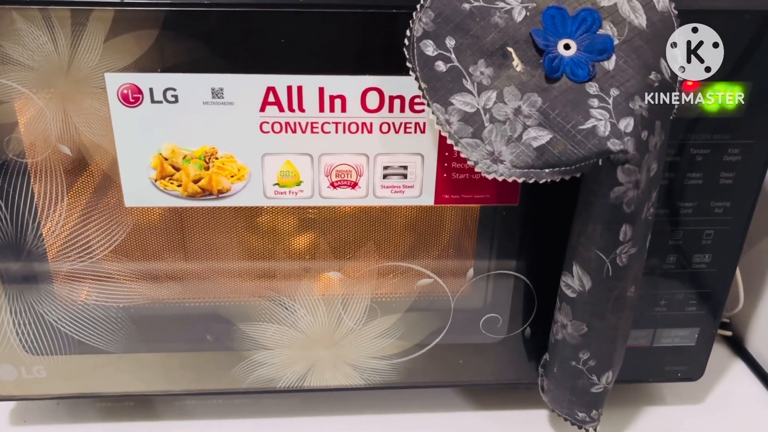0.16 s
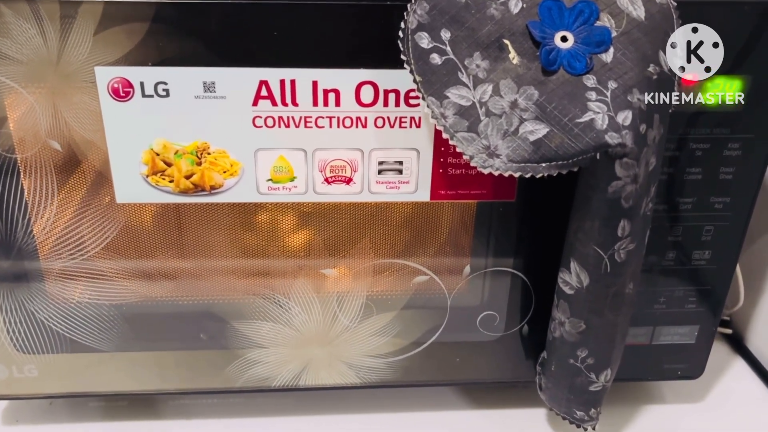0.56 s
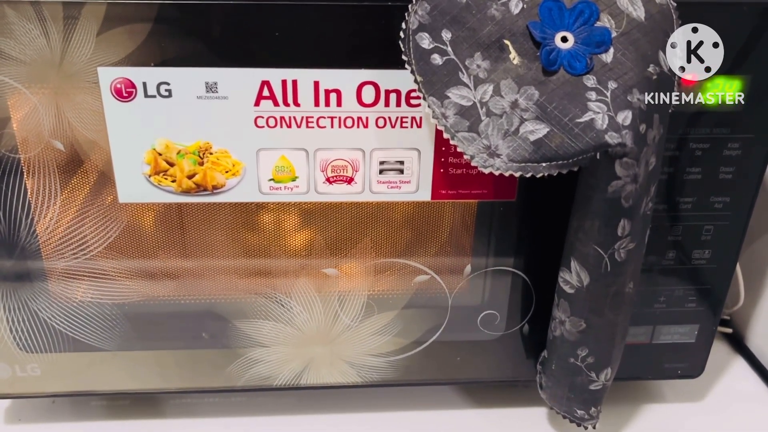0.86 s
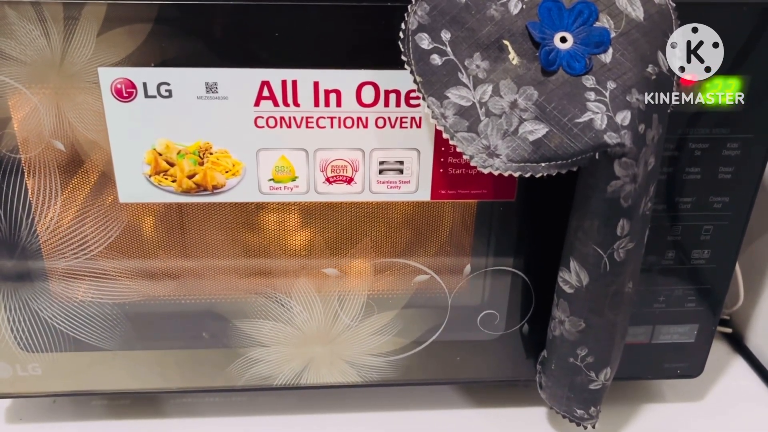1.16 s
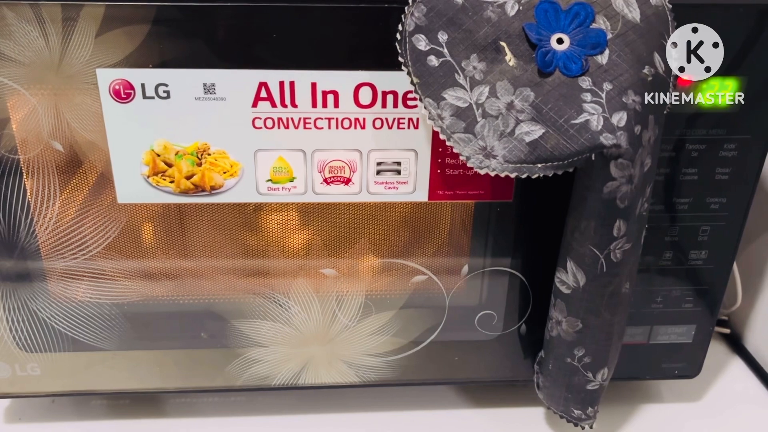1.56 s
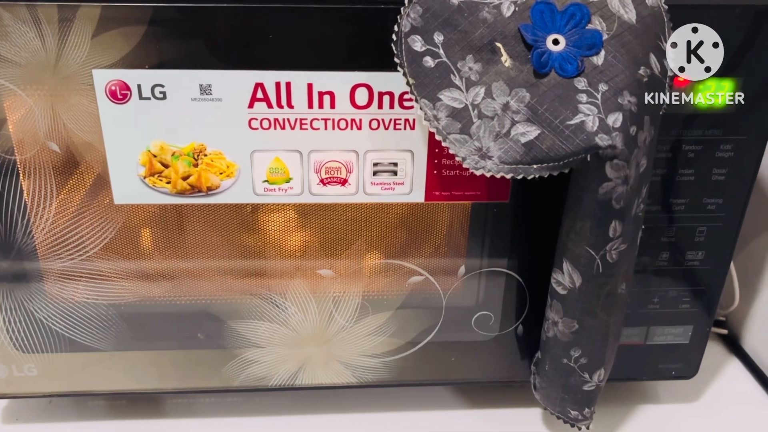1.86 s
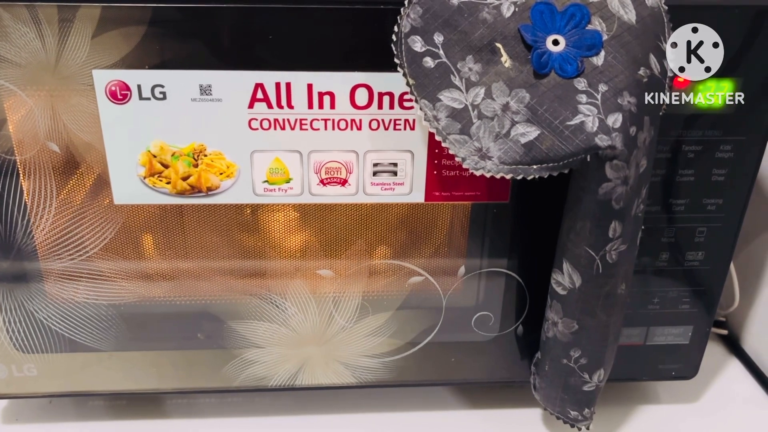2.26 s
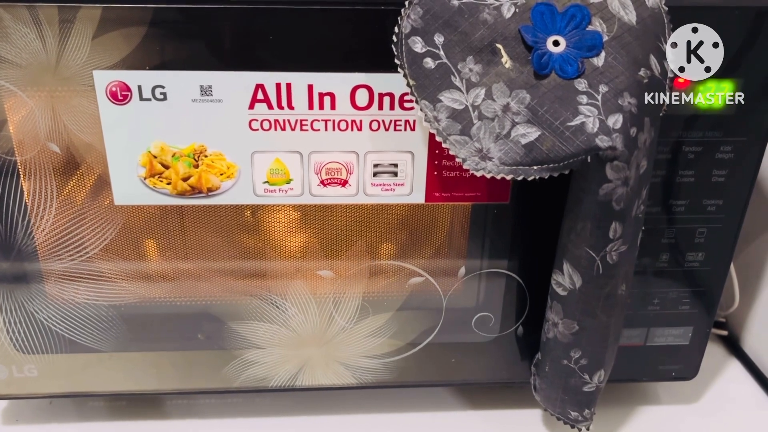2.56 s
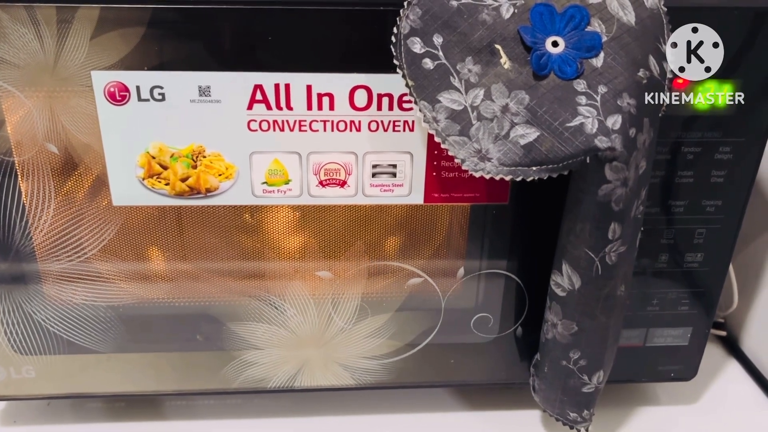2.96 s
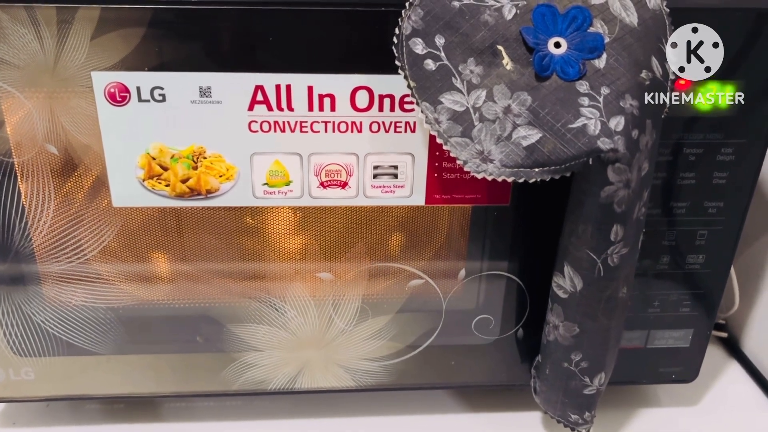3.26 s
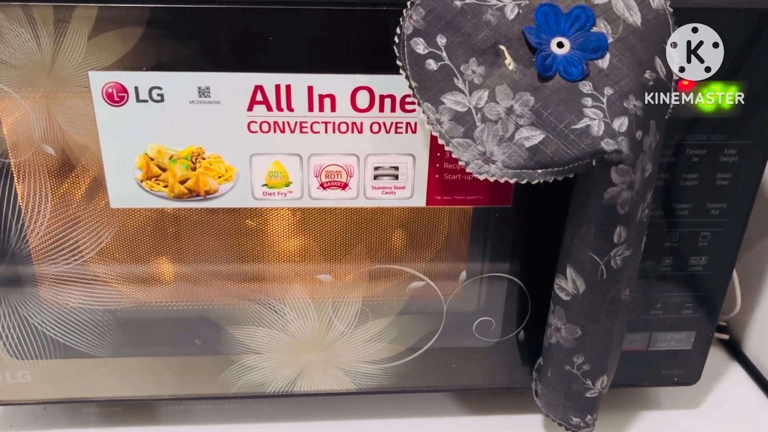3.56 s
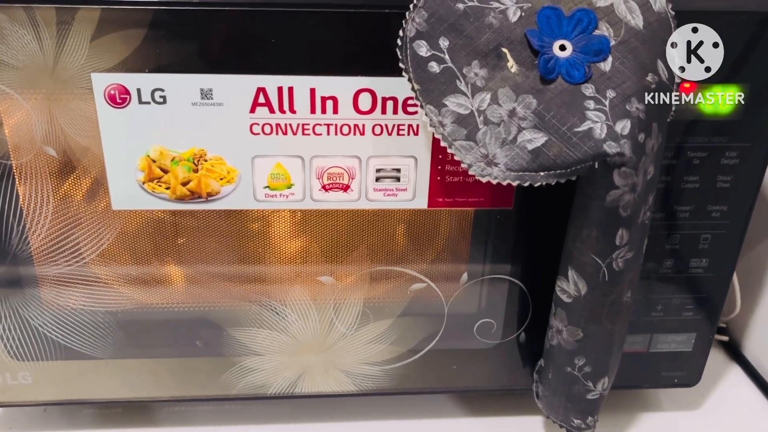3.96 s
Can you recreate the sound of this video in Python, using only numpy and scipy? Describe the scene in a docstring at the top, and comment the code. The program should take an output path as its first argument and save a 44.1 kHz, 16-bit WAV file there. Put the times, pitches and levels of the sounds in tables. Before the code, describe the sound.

Continuous appliance drone from a working microwave oven, captured by a nearby phone. Low transformer hum dominates together with the fan's blade tone, whose octave swells and sinks slightly. Boxy, duct-like air noise fills the lower midrange, dull in the treble, with a quiet electrical buzz. The stereo bass is centred while higher sounds are wider; the level is even from beginning to end.

```python
"""Kitchen: a microwave oven runs steadily, close to a hand-held phone.
Fan: noise shaped by duct resonances is the rushing air and low rumble; partials locked to the shaft
are the blade tone and its relatives. Transformer: wavering mains harmonics are the hum and the steel's
faint whine; a noise pattern repeated every mains cycle is its buzz."""
import sys
import numpy as np
from scipy import signal
from scipy.fft import rfft, irfft
from scipy.io import wavfile

SR = 44100
rng = np.random.default_rng(int(sys.argv[2]) if len(sys.argv) > 2 else 0)


def wav_out(sig):
    """Save sig, one row per channel (or a flat mono array), as 16-bit PCM at SR to the path in sys.argv[1]."""
    wavfile.write(sys.argv[1], SR, np.round(np.clip(np.atleast_2d(sig).T, -1, 1) * 32767).astype(np.int16))


N = 181761
TIME = np.arange(N) / SR  # s
BIN_HZ = np.arange(N // 2 + 1) * SR / N
MAINS_HZ = 50.07


def undb(db):
    """Decibels to amplitude gain."""
    return 10 ** (np.asarray(db) / 20)


def at(points, hz):
    """Interpolate a spectrum on a log-frequency axis."""
    f_hz, value = np.transpose(points)
    return np.interp(np.log(np.maximum(hz, 1)), np.log(f_hz), value)


def curve(points):
    """Gain over time from (t/s, level/dB) points."""
    return undb(np.interp(TIME, *np.transpose(points)))


def swell(crest_s, half_width_s, rise_db):
    """Gain that rises smoothly to one crest and falls back."""
    return undb(rise_db * np.exp(-((TIME - crest_s) / half_width_s) ** 2))


def colour(noise, db_per_hz):
    """Filter unit white noise to the given density."""
    return irfft(rfft(noise) * undb(db_per_hz) * np.sqrt(SR / 2), N)


def walk(rate_hz):
    """Slow random signal, zero mean, spread 1, moving at up to about rate_hz."""
    lowpass = (BIN_HZ > 0) / (1 + (BIN_HZ / rate_hz) ** 2)
    x = irfft(rfft(rng.standard_normal(N)) * lowpass, N)
    return x / x.std()


def ports(mid, side, hz):
    """Left and right from the shared and unshared sound field, at equal total power."""
    # difference between the microphones: f/Hz, side minus mid/dB
    side_level = [(50, -26.5), (110, -25.5), (170, -15), (320, -11), (500, -4), (900, -3.5), (1250, -4.5),
                  (1520, 2.5), (1900, -1.5), (2400, -2), (4300, -5), (7000, 0.5), (9000, -15), (12000, 17),
                  (14500, -6)]
    # balance: f/Hz, left minus right/dB
    left_right = [(250, 0), (450, -.2), (700, -.5), (1300, .5), (2400, .5), (4400, 1), (8000, 0)]
    width = undb(at(side_level, hz))
    lean = undb(at(left_right, hz) / 2)
    left = (mid + width * side) * lean
    right = (mid - width * side) / lean
    return np.array([left, right]) / np.sqrt(1 + width ** 2)


def spread(pair):
    """Two unrelated signals become one wide sound, its width set per frequency."""
    return irfft(ports(*rfft(pair), BIN_HZ), N)


def tone(turns, hz, db, unsteady, rate_hz, diffuse=.5):
    """Partial wavering in size and phase; reflections shift its phase between the microphones."""
    drift = (walk(rate_hz) + 1j * walk(rate_hz)) / np.sqrt(2)
    waver = (1 + unsteady * drift) / np.sqrt(1 + unsteady ** 2)
    mid = waver * np.exp(2j * np.pi * (turns + rng.random()))
    side = diffuse * 1j * rng.choice([-1, 1]) * mid
    return np.sqrt(2) * undb(db) * ports(mid, side, hz).real


def fan_air(flutter_db=0.44, peak_ripple_db=2.2, ripple_hz=22, ripple_centre_hz=1500, surge_rate_hz=8):
    """Turbulence rings the duct and surges by band; counter and wall reflections ripple its spectrum."""
    # rushing air: f/Hz, density/(dB per Hz)
    air_density = [(20, -94), (30, -88.5), (42, -74.5), (62, -72), (85, -71.5), (125, -67), (165, -65),
                   (260, -73.5), (380, -74), (470, -76.5), (800, -77), (1050, -83), (1500, -84),
                   (2300, -89.5), (3000, -93), (4500, -98.5), (5300, -102), (6500, -106.5), (9000, -108.5),
                   (10800, -112), (12000, -116), (15000, -115.5)]
    # hollow resonances of casing and duct: f/Hz, width/Hz, lift/dB
    duct_modes = [(41, 5, 5), (221.6, 15, 3.5), (316.6, 16.4, 10.5), (341.6, 16, 5.5), (432, 13, 7),
                  (452, 12, 4), (508, 23, 5), (545, 12, -5.5), (633, 26, 5), (683, 35, 3), (735, 14, 3.5),
                  (745, 10, -7.5), (794, 26, 0), (864, 31, 1.5), (930, 24, 2.5), (1025, 24, -1.5),
                  (1230, 55, 5.5), (1740, 84, 4), (1823, 45, -3.5), (1930, 70, 1), (2280, 100, 2.5),
                  (2510, 90, 2.5)]
    # bands surging on their own as eddies come and go: low f/Hz, high f/Hz, depth/dB
    eddy_bands = [(25, 80, 1.8), (400, 570, 1), (570, 760, 1), (760, 1000, 1)]

    db = at(air_density, BIN_HZ)
    for hz, width_hz, lift_db in duct_modes:
        db = db + lift_db / (1 + (2 * (BIN_HZ - hz) / width_hz) ** 2)

    knots = np.arange(4096)
    knot_values = rng.standard_normal((2, len(knots)))
    ripple = np.array([np.interp(BIN_HZ / ripple_hz, knots, row) for row in knot_values])
    # deepest in the midrange: treble leaves from many vents and evens out
    ratio = BIN_HZ / ripple_centre_hz
    db = db + peak_ripple_db * ripple * 2 * ratio / (1 + ratio ** 2)

    air = spread(colour(rng.standard_normal((2, N)), db))
    spectrum = rfft(air)
    for low_hz, high_hz, surge_db in eddy_bands:
        band = irfft(spectrum * ((BIN_HZ >= low_hz) & (BIN_HZ < high_hz)), N)
        air = air + band * (undb(surge_db * walk(surge_rate_hz)) - 1)
    return air * undb(flutter_db * walk(14))


def fan_tones(shaft_start_hz=43.465, creep_hz_per_s=.01375, jitter_hz=0.016):
    """Blades chop uneven air as the fan creeps up in speed; magnetic pull adds tones beating with the hum."""
    # four blades to a turn: multiple of shaft rate, level/dB, unsteadiness/share of the tone
    shaft_partials = [(3, -64, 0.2), (4, -34.5, 0.013), (5, -66.5, 0.34), (7, -63, 0.3), (8, -44.5, 0.24),
                      (12, -58.5, 0.3), (16, -63, 0.36), (18, -63.5, 0.66), (20, -69, 0.52), (28, -67, 0.6)]
    # pull varies as the rotor turns (sum and difference tones):
    # multiple of mains, multiple of shaft rate, level/dB
    motor_partials = [(4, -1, -59.5), (2, 2, -57), (6, 1, -61), (8, 5, -69.5)]
    # blade tone: t/s, level change/dB
    blade_level = [(0, 0.9), (.5, -0.6), (.8, 0.3), (1.5, 0), (2.3, 0.5), (2.82, 1), (3.15, 0), (3.7, 0.5),
                   (4.1, -0.3)]
    # its octave swells and sinks: t/s, level change/dB
    octave_level = [(0, -4), (.2, -1.5), (.33, -5), (.75, -2.5), (1.0, 2.5), (1.11, -2.5), (1.22, 0.5),
                    (1.5, -1), (1.72, 2), (1.92, -1), (2.35, 3), (2.65, -7), (2.8, 0), (3.08, -2.5),
                    (3.24, 5.5), (3.45, -7.5), (3.62, 1.5), (3.8, -1.5), (4.05, -3.5)]

    shaft_hz = shaft_start_hz + creep_hz_per_s * TIME + jitter_hz * walk(3.1)
    turns = np.cumsum(shaft_hz) / SR
    gains = {4: curve(blade_level), 8: curve(octave_level)}
    out = 0
    for k, db, unsteady in shaft_partials:
        partial = tone(k * turns, k * shaft_start_hz, db, unsteady, rate_hz=4.1, diffuse=0.23)
        out = out + gains.get(k, 1) * partial
    for m, k, db in motor_partials:
        hz = m * MAINS_HZ + k * shaft_start_hz
        out = out + tone(m * MAINS_HZ * TIME + k * turns, hz, db, unsteady=0.28, rate_hz=2)
    return out


def steel_whine():
    """Thin, flickering tones where a panel rings on a high harmonic of the mains."""
    # harmonics the panels pick out: multiple of mains, level/dB
    panel_partials = [(43, -74.5), (46, -79), (53, -81.5), (68, -78), (78, -74.5), (90, -80), (94, -89),
                      (96, -90), (100, -90), (139, -93), (141, -88.5), (150, -95), (158, -90.5), (160, -91),
                      (166, -91), (174, -89.5), (177, -95), (180, -98), (195, -99.5), (197, -94),
                      (219, -100)]
    out = 0
    for k, db in panel_partials:
        hz = k * MAINS_HZ
        out = out + tone(hz * TIME, hz, db, unsteady=0.45, rate_hz=4, diffuse=0.6)
    return out


def steel_buzz(burst_at_cycles=0.54, burst_width_cycles=0.092, ring_hz=11000):
    """The same tiny rattle repeats every mains cycle, strongest while the magnetron draws current."""
    # transformer steel: f/Hz, density/(dB per Hz)
    buzz_density = [(1500, -114), (3500, -109), (5000, -111), (6200, -118), (7200, -114), (8800, -114),
                    (10800, -119), (12500, -128)]
    size = round(SR / MAINS_HZ)  # samples per cycle
    phase = np.arange(size) / size
    load = np.exp(-.5 * ((phase - burst_at_cycles) / burst_width_cycles) ** 2)
    bursts = rng.standard_normal((2, size)) * load / np.sqrt(np.mean(load ** 2))
    ringing = rng.standard_normal((2, size))
    # low panel modes ring through the whole cycle; only the top dies away between bursts
    burst_share = 1 / (1 + (ring_hz / np.maximum(BIN_HZ, 1)) ** 4)
    cycle = np.arange(N) % size
    db = at(buzz_density, BIN_HZ)
    top = colour(bursts[:, cycle], db + 10 * np.log10(burst_share))
    low = colour(ringing[:, cycle], db + 10 * np.log10(1 - burst_share))
    return spread(top + low)


def transformer_hum(sway_db=0.2, max_waver=0.77, waver_rate_hz=3.5):
    """Mains harmonics sway together; short waves waver more as the kitchen's standing waves shift."""
    # hum through the casing: multiple of mains, level/dB
    hum_partials = [(1, -52), (2, -34), (3, -45.5), (4, -56.5), (5, -62.5), (6, -50.5), (7, -65.5),
                    (8, -56.5), (9, -55.5), (10, -63), (11, -66.5), (12, -71), (14, -61.5), (15, -71),
                    (17, -64.5), (18, -72), (19, -64.5), (20, -68), (23, -77.5), (24, -70), (26, -72.5)]
    # main partial, twice the mains: t/s, level change/dB
    main_level = [(0, 0.6), (.5, -0.5), (.8, -0.8), (1.15, 0.5), (1.85, -0.1), (2.25, -0.9), (2.65, -0.2),
                  (3.03, -1.4), (3.4, 0), (3.68, -0.5), (4.1, 0.2)]
    # sixth partial grows towards the end: crest t/s, half width/s, rise/dB
    sixth_swell = (4.03, 0.5, 4.6)

    gains = {2: curve(main_level), 6: swell(*sixth_swell)}
    out = 0
    for k, db in hum_partials:
        hz = k * MAINS_HZ
        shortness = min(hz / 700, 1)
        waver = max_waver * shortness ** 2
        partial = tone(hz * TIME, hz, db, waver, waver_rate_hz, diffuse=shortness)
        out = out + gains.get(k, 1) * partial
    return out * undb(sway_db * walk(0.99))


def scene():
    """Fan and transformer run together, without a break."""
    return fan_air() + fan_tones() + steel_whine() + steel_buzz() + transformer_hum()


def record(dry, top_hz=15400):
    """The phone cuts the top of the treble: steep elliptic low-pass."""
    return signal.sosfilt(signal.ellip(10, .1, 80, top_hz, fs=SR, output="sos"), dry)


dry = scene()
out = record(dry)
wav_out(out)
```